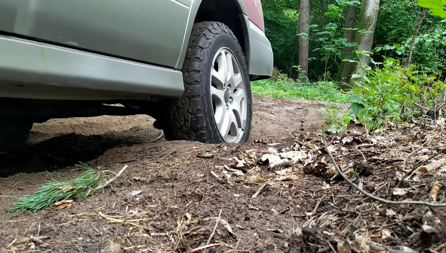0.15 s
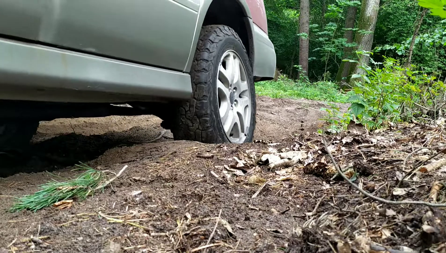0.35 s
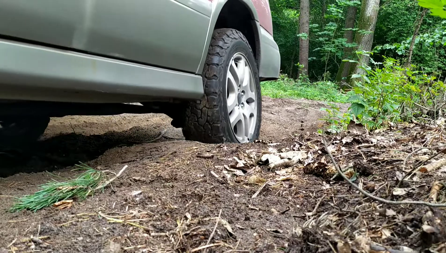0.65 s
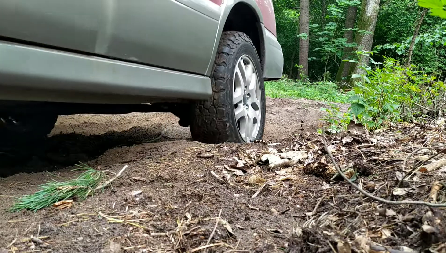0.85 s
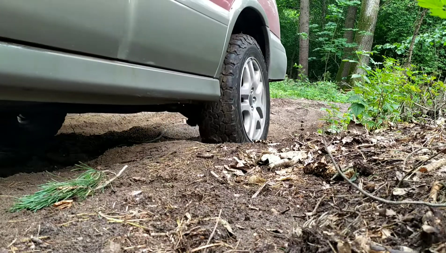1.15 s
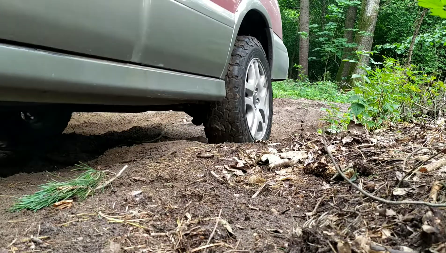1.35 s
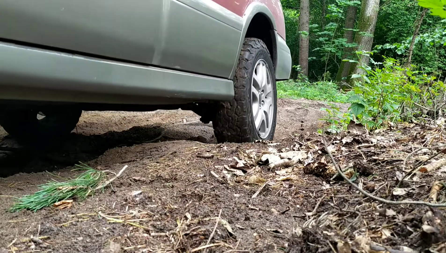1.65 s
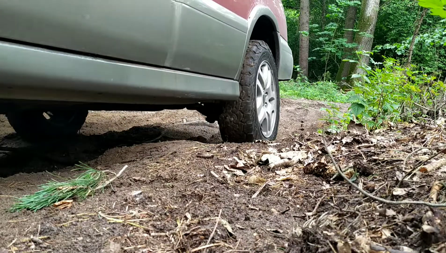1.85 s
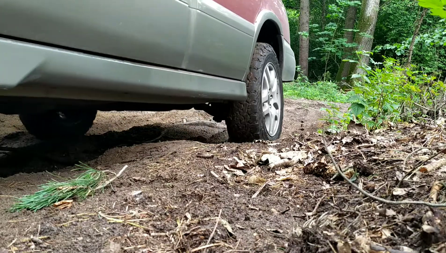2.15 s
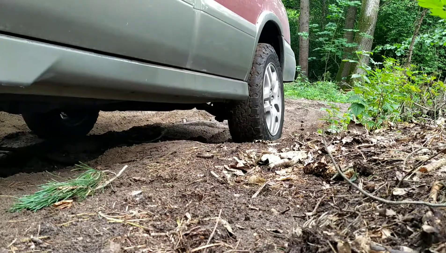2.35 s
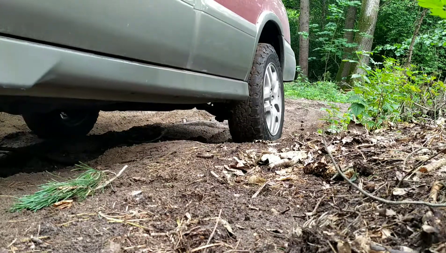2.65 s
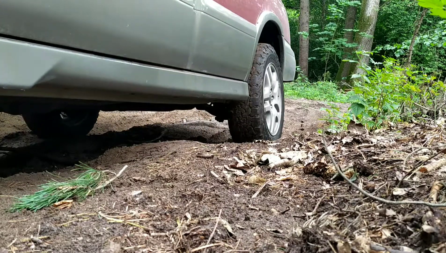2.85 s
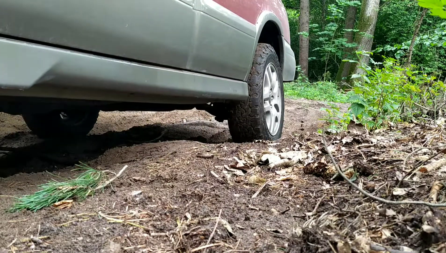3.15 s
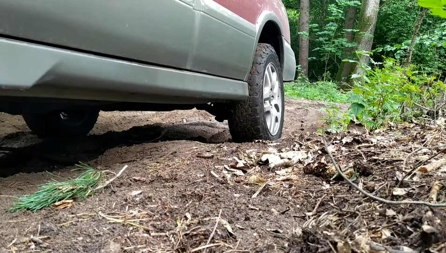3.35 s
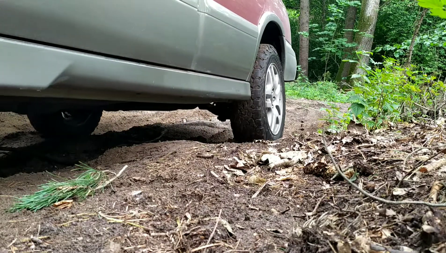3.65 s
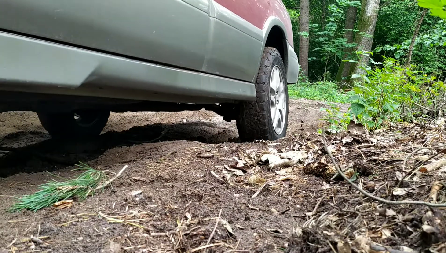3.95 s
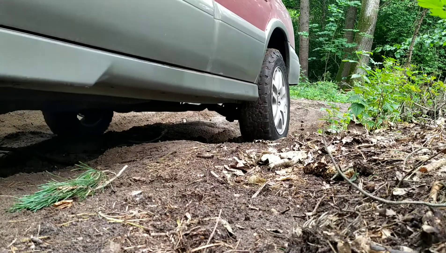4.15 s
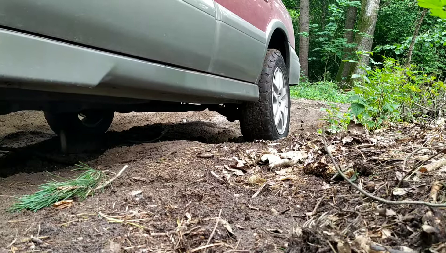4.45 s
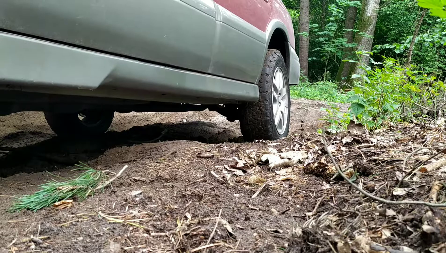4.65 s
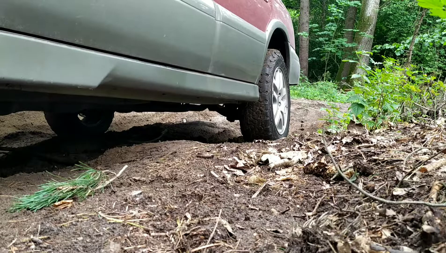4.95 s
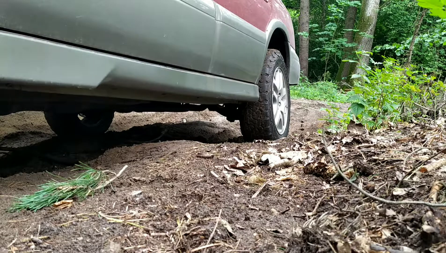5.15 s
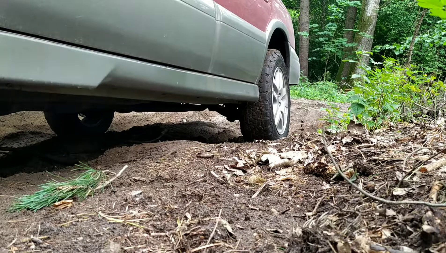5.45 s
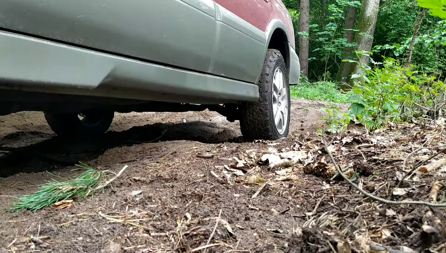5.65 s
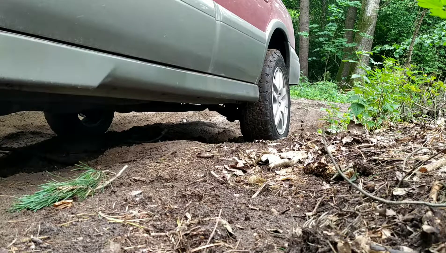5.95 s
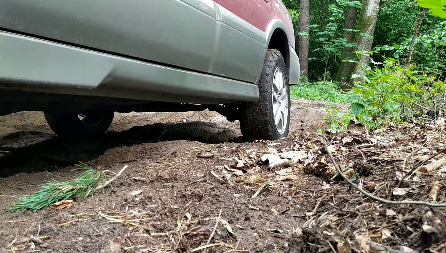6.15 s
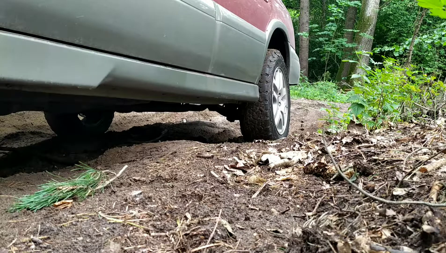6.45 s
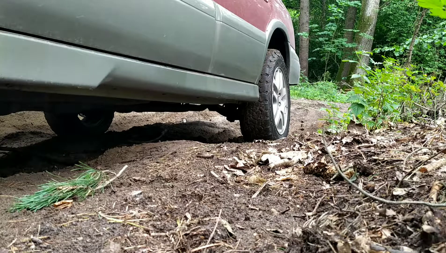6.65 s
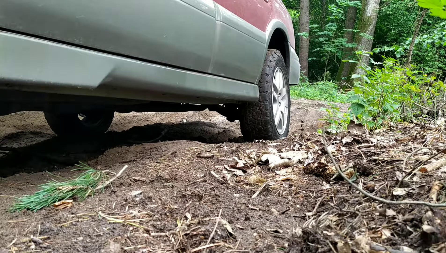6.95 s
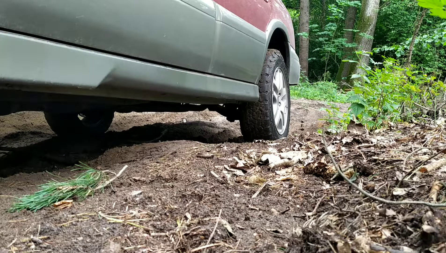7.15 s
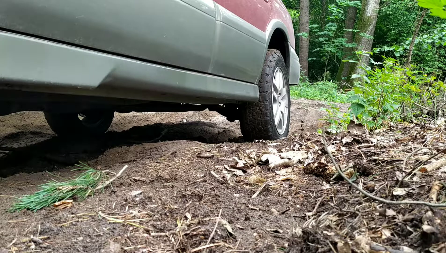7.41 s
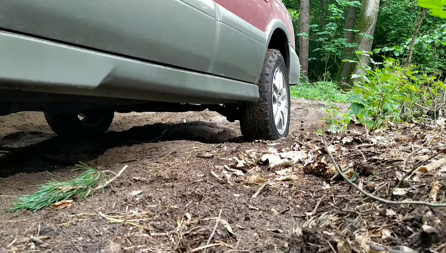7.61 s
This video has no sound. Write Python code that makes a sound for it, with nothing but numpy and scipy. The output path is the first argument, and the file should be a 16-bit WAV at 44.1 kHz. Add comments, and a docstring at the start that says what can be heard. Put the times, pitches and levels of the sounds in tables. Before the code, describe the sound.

A low nearby microphone hears a car creeping over a dirt mound: lumpy exhaust burble, block growl, airy fan drone, belt hiss and ticks growing slightly nearer. Crisp twig cracks lead to a metallic knock; revs sink to a slow chug, then rise back to idle with tyre chirps and a shudder. A thump and gravelly crunch end the movement; the engine settles, then slows.

```python
"""Flat-four car creeping over a mound

A flat-four estate car creeps over a dirt mound at idle; its revs sag, pick up again and droop at the end.
Two banks of firings ring pipe resonances in an uneven throb; the block growls, a silencer booms, panels shudder.
Radiator fan tones hum in rushing air; valves tick in noise bands of belt hiss and intake air, nearer as it rolls.
Twigs snap, struck steel clanks, tyres scrub soil and crack stones: noise bursts and ringing modes with an echo."""
import sys
import numpy as np
from scipy import signal
from scipy.fft import rfft, irfft, next_fast_len
from scipy.io import wavfile
from scipy.ndimage import map_coordinates

SR = 44100
rng = np.random.default_rng(int(sys.argv[2]) if len(sys.argv) > 2 else 0)


def wav_out(sig):
    """Save sig, one row per channel (or a flat mono array), as 16-bit PCM at SR to the path in sys.argv[1]."""
    wavfile.write(sys.argv[1], SR, np.round(np.clip(np.atleast_2d(sig).T, -1, 1) * 32767).astype(np.int16))


N = 343098
TIME = np.arange(N) / SR  # s


def amp(db):
    """Decibels to gain."""
    return 10 ** (np.asarray(db) / 20)


def unit(x):
    """Scale to rms 1."""
    return x / np.sqrt(np.mean(x ** 2) + 1e-20)


def along(points, hz):
    """Interpolate (hz, value) points on a log frequency axis."""
    point_hz, value = np.transpose(points)
    return np.interp(np.log(hz + 1), np.log(point_hz + 1), value)


def curve(rows):
    """Interpolate (time_s, value) rows to one value per sample."""
    time_s, value = np.transpose(rows)
    return np.interp(TIME, time_s, value)


def wobble(knots_per_s):
    """Smooth random curve through normal knots."""
    knots = rng.standard_normal(int(N * knots_per_s / SR) + 4)
    return map_coordinates(knots, [TIME * knots_per_s])


def filtered(x, response):
    """Multiply the spectrum of x by a complex response of frequency."""
    size = next_fast_len(N + SR // 2)
    hz = np.fft.rfftfreq(size, 1 / SR)
    return irfft(rfft(x, size) * response(hz), size)[..., :N]


def lagged(x, lag_s):
    """One-pole inertia, starting from zero."""
    keep = np.exp(-1 / (lag_s * SR))
    return signal.lfilter([1 - keep], [1, -keep], x)


# left-right likeness of noise: hz, correlation
ALIKE = [(100, .999), (250, 1), (500, 1), (1000, 0.84), (2000, 0.66), (4000, 0.39), (8000, 0.088),
         (15000, 0.098)]


def rush(spectrum, grain_db=0):
    """Stereo noise of rms 1, less alike towards the treble; fast random gain makes it gritty."""
    noise = rng.standard_normal((2, N)) * amp(grain_db * wobble(900))

    def mid_side(hz):
        angle = np.arccos(np.clip(along(ALIKE, hz), -1, 1)) / 2
        return amp(along(spectrum, hz)) * [np.cos(angle), np.sin(angle)]

    mid, side = filtered(noise, mid_side)
    return unit(np.array([mid + side, mid - side]))


def fade(start_s, t60_s, attack_s):
    """Envelope of a blow: quick rise, exponential decay."""
    t = np.maximum(TIME - start_s, 0)
    return (1 - np.exp(-t / attack_s)) * amp(-60 * np.minimum(t / t60_s, 2))


def blows(rows, spectrum, grain_db, attack_s):
    """Gritty noise bursts that die away quickly."""
    envelope = sum(amp(db) * fade(start_s, t60_s, attack_s) for start_s, db, t60_s in rows)
    return envelope * rush(spectrum, grain_db)


def ringing(start_s, modes, waver_turns):
    """Struck modes decay; random phase waver broadens them."""
    first = int(start_s * SR)
    span = slice(first, first + SR // 4)
    t = np.maximum(TIME[span] - start_s, 0)
    attack = 1 - np.exp(-t / 0.0021)
    out = np.zeros(N)
    for hz, db, t60_s in modes:
        drift = map_coordinates(rng.standard_normal(128), [t * 450])
        turns = hz * t + waver_turns * drift + rng.random()
        out[span] += amp(db - 60 * t / t60_s) * attack * np.sin(2 * np.pi * turns)
    return out


# crankshaft speed: time_s, speed_rpm
SPEED = [(0.0, 784.7), (0.47, 778.7), (0.9, 750.9), (1.24, 737.1), (1.55, 683.6), (1.87, 620.5),
         (2.11, 594.5), (2.6, 620.9), (3.04, 632.2), (3.25, 697.8), (3.48, 810.7), (3.85, 788.7),
         (4.25, 810.1), (4.9, 795.6), (5.9, 774.8), (6.62, 774.3), (7.14, 735.4), (7.78, 634.5)]


def engine_rpm():
    """Crankshaft speed at each sample."""
    return curve(SPEED)


# labouring up the mound, easing, one more push, unloading: time_s, load_0_1
LOAD = [(0, 0.66), (.95, 0.52), (1.3, 0.17), (2.4, 0.08), (2.9, 0.1), (3.15, 0.4), (3.35, 0.64),
        (3.7, 0.45), (4.2, 0.3), (6.7, 0.04), (7.78, 0)]
# car rolling past and coming to rest: time_s, way_0_1
TRAVEL = [(0, 0), (1.9, 0.75), (3.1, 0.7), (4.3, 1)]
IDLE_RPM = 780


def level_db(law):
    """Level of a part: linear in engine speed, load and the car's travel."""
    idle_db, db_per_rpm, load_db, way_db = law
    speed_db = db_per_rpm * (engine_rpm() - IDLE_RPM)
    return idle_db + speed_db + load_db * curve(LOAD) + way_db * curve(TRAVEL)


def strokes(cycle, firings, scatter_db, jitter_cycles):
    """One impulse each time the engine cycle passes a listed place."""
    train = np.zeros(N)
    for place, db in firings:
        chance = rng.uniform(-0.9, 1, (int(cycle[-1]) + 1, 2))
        when = np.arange(len(chance)) + place + jitter_cycles * chance[:, 0]
        at = np.searchsorted(cycle, when)
        train += np.bincount(at, amp(db + scatter_db * chance[:, 1]), N + 1)[:N]
    return train


def bank(cycle, firings, resonances):
    """Firings ring resonances; the deep bass below about 48 Hz is cut away; rms 1."""
    def ring(hz):
        return sum(coupling * 1j * hz * width / (centre ** 2 - hz ** 2 + 1j * hz * width)
                   for centre, width, coupling in resonances)

    def low_cut(hz):
        b, a = signal.butter(N=6, Wn=48, btype="high", analog=True)
        return signal.freqs(b, a, hz)[1]

    pulses = strokes(cycle, firings, scatter_db=.7, jitter_cycles=.0007)
    return unit(filtered(pulses, lambda hz: ring(hz) * low_cut(hz)))


# fan tones: shaft_multiple, relative_db
FAN_TONES = [(4, -41.5), (5, -47), (6, -54), (8, -57.5), (9, -60.5), (10, -55), (12, -61.5), (14, -61.5),
             (15, -58.5), (16, -70), (18, -60.5)]
# level of the tones: time_s, gain_db
HUM = [(1, -1.5), (2.1, -1), (2.8, 1), (3.6, 1.5)]
# air through the radiator: hz, relative_db_per_hz
FAN_AIR = [(25, -20), (60, 1.5), (150, 1), (250, -1), (400, 1.5), (520, 1), (640, -5), (800, -10.5),
           (1100, -9), (1800, -36), (4000, -63)]
FAN_HZ, FAN_SAG_HZ_PER_RPM, FAN_LAG_S = 37.9, .0095, 0.319
CHARGING_RPM = 694.5  # below this the alternator underfeeds the electric fan


def fan():
    """Shaft and blade tones, ruffled by turbulent air; inertia delays the fan's slowing at low revs."""
    shortfall_rpm = lagged(np.maximum(CHARGING_RPM - engine_rpm(), 0), FAN_LAG_S)
    shaft_hz = FAN_HZ - FAN_SAG_HZ_PER_RPM * shortfall_rpm
    unsteady = 1 + 0.0011 * wobble(5) + .002 * wobble(30)
    turns = np.cumsum(shaft_hz * unsteady) / SR
    tones = sum(amp(db + 1.4 * wobble(6)) * np.sin(2 * np.pi * (multiple * turns + rng.random()))
                for multiple, db in FAN_TONES)
    air = amp(-43.5 + 0.36 * wobble(10)) * rush(FAN_AIR)
    return np.sqrt(2) * amp(curve(HUM)) * tones + air


# belt hiss: hz, relative_db_per_hz
BAY_HISS = [(400, -12), (900, 9), (1400, 2.5), (2100, 0), (3000, -1), (4000, 0), (5200, -0.5), (7000, -1),
            (9000, 1), (11000, -2), (13000, -4), (15800, -11)]
# intake air: hz, relative_db_per_hz
INTAKE = [(800, -61), (1400, -12), (1800, -2), (2100, 0), (2500, -2), (3200, -5), (4100, -8), (6000, -52)]
# valve tick colour: hz, relative_db_per_hz
VALVE = [(1000, -32), (2100, -13), (3200, 2.5), (4100, 8.5), (4450, 12.5), (4900, 3.5), (6000, 5.5),
         (9000, 8.5), (15000, -2.5)]
# valve taps: cycle_place_0_1, relative_db
TAPS = [(.022, 8.5), (.09, 1.5), (.345, 4), (.55, 6), (.6, -2), (.80, 8)]
# level laws of belts, intake and valves: idle_db, db_per_rpm, full_load_db, full_way_db
HISS_LAW = (-48.5, 0.0084, -0.5, 0.54)
INTAKE_LAW = (-57.5, 0.0084, -1.5, 5.5)
VALVE_LAW = (-54.5, 0.0214, 1, 4)


def engine_bay(cycle):
    """Belts hiss and intake air rushes louder with speed; valve taps shape noise into ticks."""
    taps = strokes(cycle, TAPS, scatter_db=2, jitter_cycles=.008)
    tick_shape = fade(0, t60_s=0.045, attack_s=0.001)[:SR // 4]
    ticks = signal.fftconvolve(taps, tick_shape)[:N] * rush(VALVE, grain_db=-0.5)
    hiss = amp(level_db(HISS_LAW) + 1.08 * wobble(16)) * rush(BAY_HISS, grain_db=0.2)
    intake = amp(level_db(INTAKE_LAW) + 1.7 * wobble(40)) * rush(INTAKE, grain_db=0.5)
    return hiss + intake + amp(level_db(VALVE_LAW)) * ticks


# twigs under a tyre: start_s, level_db, t60_s, ring_hz
SNAPS = [(.09, -40.5, .07, 9200), (.737, -40.5, 0.054, 9000), (0.788, -30, 0.065, 9100),
         (.884, -40, .04, 11500), (.921, -40, .04, 11600), (0.9317, -28.5, 0.057, 12300),
         (1.313, -42, 0.065, 11500), (3.585, -44, .05, 9000), (7.442, -44, 0.18, 9000),
         (7.519, -43, 0.18, 12000)]
# snap colour: hz, relative_db_per_hz
TWIG = [(400, -22), (1200, -9), (2000, 3.5), (3000, -6), (4900, 4), (6200, -3.5), (9000, 9), (12500, 3.5),
        (15800, -7)]
TWIG_RING_DB = -5  # relative to the snap


def twigs():
    """Each twig snaps with a noise crack and a brief ring of its own."""
    snaps = blows([row[:3] for row in SNAPS], TWIG, grain_db=3.0, attack_s=0.00091)
    rings = sum(ringing(start_s, [(hz, db, t60_s)], waver_turns=.6) for start_s, db, t60_s, hz in SNAPS)
    return snaps + amp(TWIG_RING_DB) * rings


# suspension jolts: start_s, pitch_hz, level_db, t60_s
THUDS = [(0.98, 151, -28, 0.12), (0.98, 214, -29, 0.16), (2.395, 229, -28.5, 0.23), (2.409, 92, -28, 0.45),
         (2.441, 147, -31, 0.27), (2.446, 276, -31.5, 0.17), (3.441, 214, -31, 0.3),
         (4.341, 152, -15.5, 0.082), (4.342, 282, -27, 0.16), (4.388, 190, -26, 0.1),
         (4.388, 350, -33.5, 0.11), (4.387, 93, -28, 0.18)]


def body():
    """Each jolt sets low panel modes booming."""
    return sum(amp(db) * fade(start_s, t60_s, attack_s=0.0052) * np.sin(2 * np.pi * hz * (TIME - start_s))
               for start_s, hz, db, t60_s in THUDS)


# hard knock under the car and its rebound: start_s, level_db, t60_s
CLANKS = [(.980, -20.5, .045), (.984, -23.5, .075)]
# knock colour: hz, relative_db_per_hz
CLANK = [(100, 7), (220, 22), (380, 12.5), (700, 5), (1000, 11.5), (1500, 1), (3000, -7), (4500, -3),
         (6000, -3.5), (8300, 5.5), (10500, -5.5), (15800, -22)]
# struck steel modes: pitch_hz, relative_db, t60_s
STEEL = [(346, -5, 0.063), (510, -15, 0.13), (990, -7, 0.077), (1870, -13, 0.14), (2140, -13, 0.16),
         (4270, -9, 0.068), (5600, -5, 0.073), (6790, -2, 0.07), (7800, -5, .07), (8620, -12, 0.051)]
STEEL_DB = -30.5  # added to every mode


def clank():
    """A crack and its rebound; the first contact sets the steel ringing."""
    crack = blows(CLANKS, CLANK, grain_db=2, attack_s=.0005)
    return crack + amp(STEEL_DB) * ringing(CLANKS[0][0], STEEL, waver_turns=0.072)


# stones under the tread: start_s, level_db, t60_s, tilt_db_per_octave
CRUNCHES = [(4.33, -34, .04, -1), (4.3415, -29, 0.05, -3.5), (4.354, -31, 0.058, -2),
            (4.364, -37, 0.048, -3.5), (4.38, -26.5, 0.054, -2), (4.389, -28, 0.045, -2),
            (4.399, -32, 0.082, -3.5), (7.721, -34, 0.073, 4)]
# stone colour before tilt: hz, relative_db_per_hz
STONE = [(400, 12), (900, -5.5), (1700, 7.5), (3000, 4.5), (4400, 3.5), (5600, 2.5), (7400, 4.5),
         (11000, -4), (15800, -4)]


def stones():
    """Separate sharp cracks; a spectral tilt makes each duller or brighter."""
    out = 0
    for start_s, db, t60_s, tilt in CRUNCHES:
        colour = [(hz, level + tilt * np.log2(hz)) for hz, level in STONE]
        out = out + blows([(start_s, db, t60_s)], colour, grain_db=3, attack_s=.0006)
    return out


def crackle(hits_per_s):
    """Envelope of rms 1 made of separate tiny fractures."""
    hits = (rng.random(N) < hits_per_s / SR) * rng.uniform(.2, 1, N) ** 2
    fracture = fade(0, t60_s=.007, attack_s=.0002)[:SR // 10]
    energy = signal.fftconvolve(hits, fracture ** 2)[:N]
    return unit(np.sqrt(np.abs(energy)))


# tyre slips: start_s, length_s, soil_db, grit_db
SCRUBS = [(2.407, 0.091, -40, -39), (3.3, 0.24, -40.5, -49.5), (3.36, 0.069, -51, -46),
          (4.314, 0.12, -43, -43), (7.704, 0.06, -37.5, -47)]
# soil thump colour: hz, relative_db_per_hz
SOIL = [(35, -35), (80, -3), (160, 7.5), (260, -4), (450, 3), (800, -11), (1400, -27), (3000, -42)]
# grit colour: hz, relative_db_per_hz
GRIT = [(500, -30), (1000, 23), (1600, 1), (2400, 2.5), (3000, 8.5), (4000, -10), (5000, 2), (8000, 0),
        (11000, -2), (15800, -5)]
# tread sticking and letting go: start_s, level_db
CHIRPS = [(2.436, -34), (2.448, -33), (2.458, -39), (2.469, -34), (3.405, -32), (3.412, -35), (3.452, -38),
          (3.464, -38), (3.483, -42), (3.502, -42), (3.515, -41)]
# tread block modes: pitch_hz, relative_db, t60_s
TREAD = [(3520, -1, 0.046), (4130, -10, .04), (1180, -2, 0.05), (1626, -8, 0.044)]
CHIRP_GRIT_DB = -20  # grit torn loose, relative to the chirp


def tyres():
    """Soil thumps and grit crackles while a slip lasts; tread blocks chirp and stones crack."""
    soil, grit = np.zeros((2, N))
    for start_s, length_s, soil_db, grit_db in SCRUBS:
        slip = np.sin(np.pi * np.clip((TIME - start_s) / length_s, 0, 1))
        soil += amp(soil_db) * slip
        grit += amp(grit_db) * slip
    for start_s, db in CHIRPS:
        grit += amp(db + CHIRP_GRIT_DB) * fade(start_s, t60_s=0.03, attack_s=.001)
    chirps = sum(amp(db) * ringing(start_s, TREAD, waver_turns=.13) for start_s, db in CHIRPS)
    scrub = soil * rush(SOIL) + grit * crackle(hits_per_s=420) * rush(GRIT)
    return scrub + chirps + stones()


# echo colour: hz, relative_db_per_hz
ECHO = [(100, -1), (800, -2), (3500, 2), (8000, -8.5), (15800, -17)]
ECHO_DB, ECHO_T60_S = -12.5, 0.092


def echo(x):
    """Trees and the car's flank answer: a short diffuse noise tail, different in each channel."""
    tail = (rush(ECHO) * fade(0, ECHO_T60_S, attack_s=0.0048))[:, :SR // 2]
    tail = tail / np.linalg.norm(tail[0])
    return amp(ECHO_DB) * signal.fftconvolve(x, tail, axes=1)[:, :N]


# firings of the deep and the bright bank: cycle_place_0_1, relative_db
DEEP_FIRINGS = [(.078, 8), (.336, 7)]
BRIGHT_FIRINGS = [(0.569, 4.8), (.826, 8.7)]
# floor panel modes: centre_hz, width_hz, signed_coupling
PANELS = [(87.7, 7.2, 0.79), (95.6, 7, -0.91), (214, 18, .16)]
# loose rumble: hz, relative_db_per_hz
RUMBLE = [(40, -40), (72, -21), (95, -4), (135, -8), (170, -7), (220, -10), (270, -14), (600, -20),
          (1200, -35)]
# shudder level: time_s, level_db
STRAIN = [(0, -45), (.6, -45.5), (1.9, -49.5), (2.9, -56), (3.25, -39.5), (3.55, -35), (3.85, -47),
          (4.2, -39.5), (4.8, -46), (5.6, -46), (7.78, -53)]
RUMBLE_DB = -13  # relative to the panels


def shudder(cycle):
    """Under strain the deep, nearer bank shakes the floor panels, with a little loose rumble."""
    panels = bank(cycle, DEEP_FIRINGS, PANELS)
    return amp(curve(STRAIN)) * (panels + amp(RUMBLE_DB) * rush(RUMBLE))


# engine block modes: centre_hz, width_hz, signed_coupling
BLOCK = [(225.4, 30, 0.41), (318, 13.6, -0.97), (381, 14, 0.33), (462, 14, -0.97), (569, 63, 0.2)]
# block level law: idle_db, db_per_rpm, full_load_db, full_way_db
BLOCK_LAW = (-57, -0.0044, -2.5, 4)


def block(cycle):
    """All four firings shake the engine block into a growl."""
    return amp(level_db(BLOCK_LAW)) * bank(cycle, DEEP_FIRINGS + BRIGHT_FIRINGS, BLOCK)


# pipe resonances of each bank: centre_hz, width_hz, signed_coupling
DEEP_PIPE = [(65.5, 9.4, 0.46), (82.8, 27, -0.127), (114, 2.4, 0.056), (200, 21, -0.022)]
BRIGHT_PIPE = [(64.1, 7.1, 0.095), (125.8, 12.8, -0.12), (145, 52, 0.0099), (205, 3.8, -0.018)]
# silencer boom: centre_hz, width_hz, signed_coupling
SILENCER = [(88, 2.15, 1)]
# level laws of both banks and the boom: idle_db, db_per_rpm, full_load_db, full_way_db
DEEP_LAW = (-34, 0.0289, 8.5, 0.5)
BRIGHT_LAW = (-37.5, 0.051, 7, 1.5)
BOOM_LAW = (-43.5, -0.0268, 5, -5)


def exhaust(cycle):
    """Each bank fires twice in a row: deep and bright throbs take turns over a boom that outlasts the revs."""
    deep = amp(level_db(DEEP_LAW)) * bank(cycle, DEEP_FIRINGS, DEEP_PIPE)
    bright = amp(level_db(BRIGHT_LAW)) * bank(cycle, BRIGHT_FIRINGS, BRIGHT_PIPE)
    boom = amp(level_db(BOOM_LAW)) * bank(cycle, BRIGHT_FIRINGS, SILENCER)
    return (deep + bright + boom) * amp([[.45], [-.45]])


LEFT_LAG_S = .000472  # left behind right


def scene():
    """Car and ground sounds from one side, so the left channel lags."""
    cycle = np.cumsum(engine_rpm()) / 120 / SR  # two crank turns a cycle
    bay = engine_bay(cycle) * amp([[-.9], [.9]])
    car = fan() + bay + shudder(cycle) + block(cycle) + exhaust(cycle)
    ground = twigs() + body() + clank() + tyres()
    sides = np.array([[-1], [1]])
    return filtered(car + ground + echo(ground), lambda hz: np.exp(1j * np.pi * hz * LEFT_LAG_S * sides))


TOP_HZ = 15850


def record(dry):
    """Nothing passes above the band limit."""
    return filtered(dry, lambda hz: hz < TOP_HZ)


dry = scene()
out = record(dry)
wav_out(out)
```